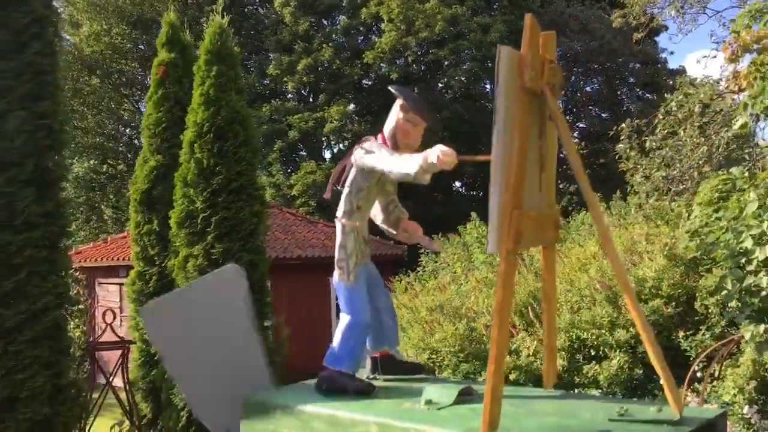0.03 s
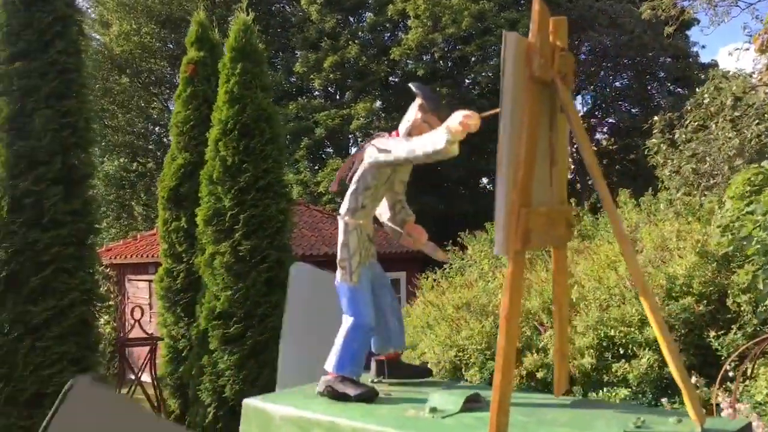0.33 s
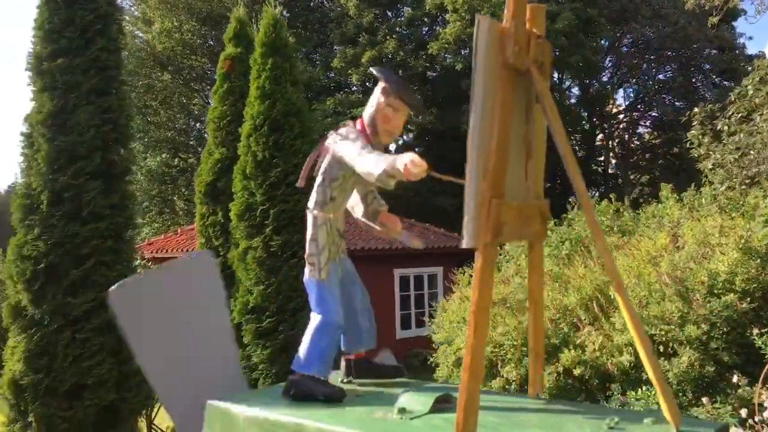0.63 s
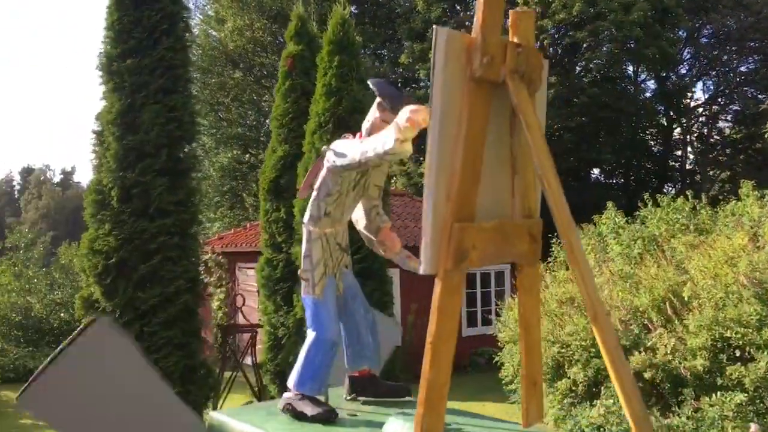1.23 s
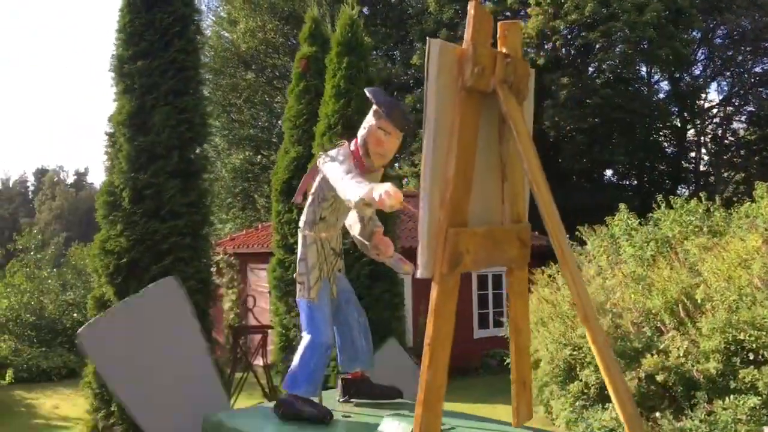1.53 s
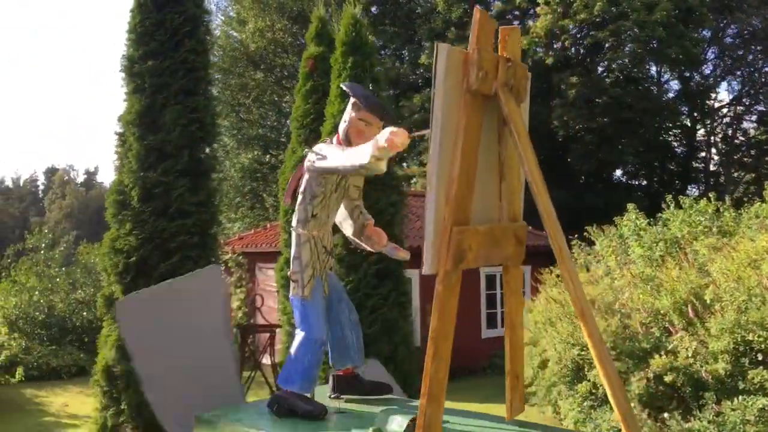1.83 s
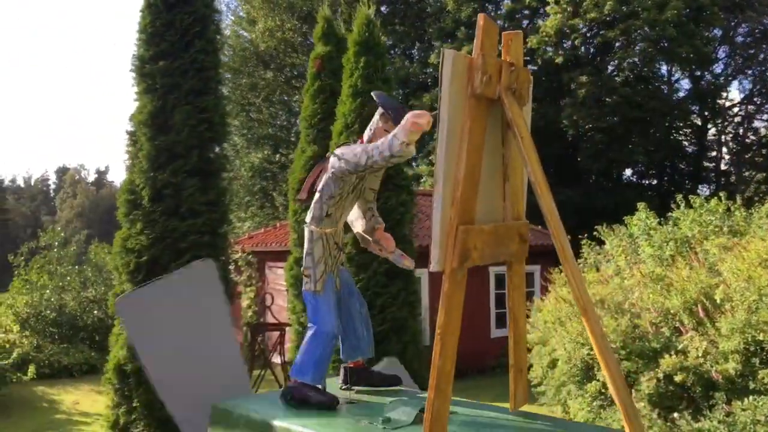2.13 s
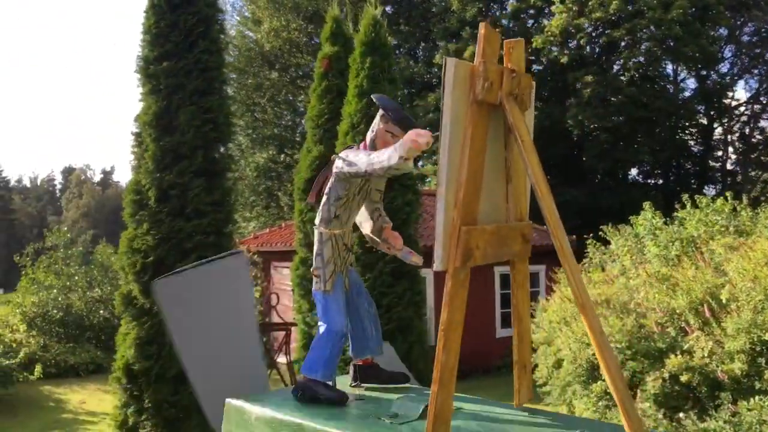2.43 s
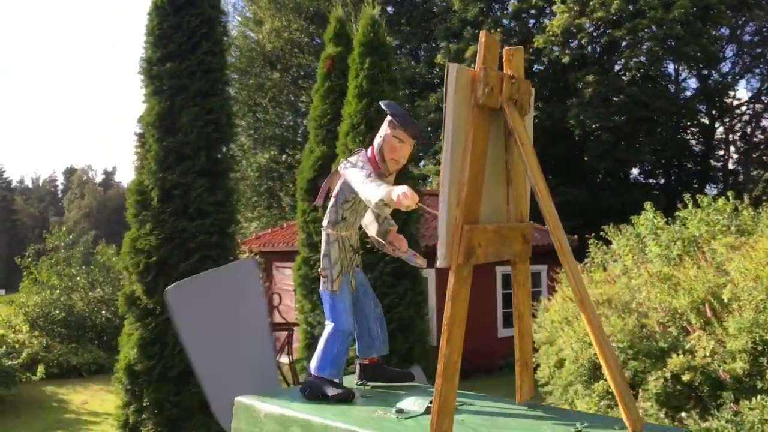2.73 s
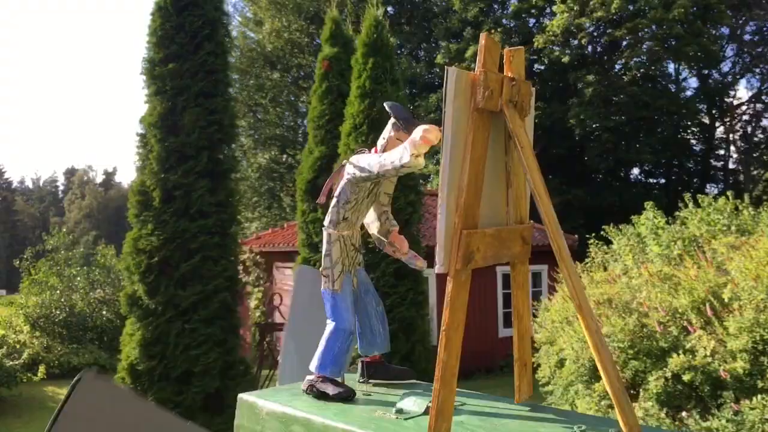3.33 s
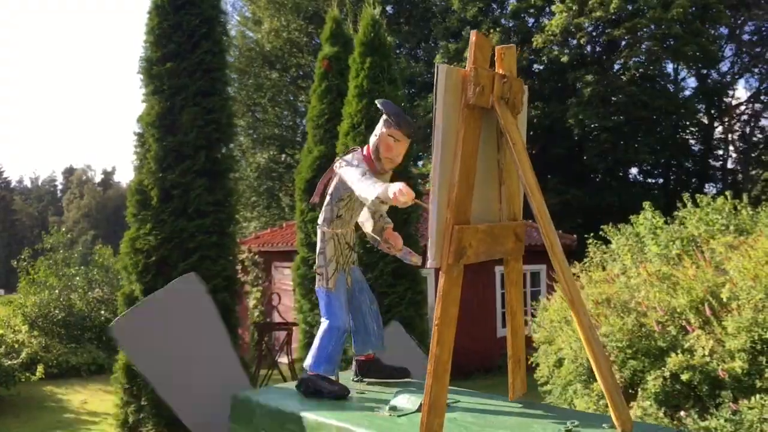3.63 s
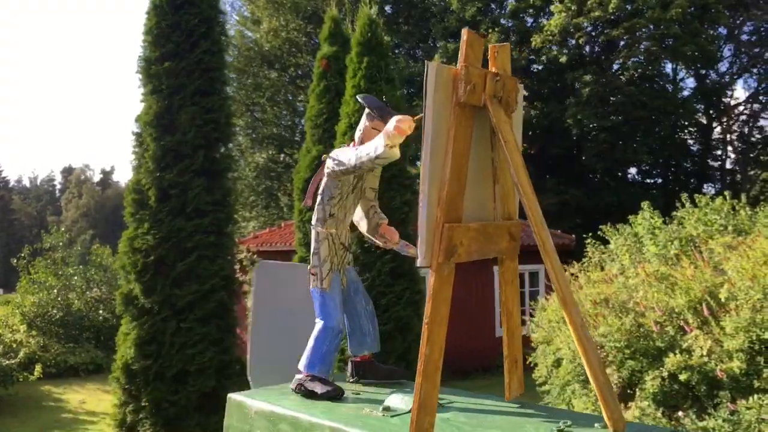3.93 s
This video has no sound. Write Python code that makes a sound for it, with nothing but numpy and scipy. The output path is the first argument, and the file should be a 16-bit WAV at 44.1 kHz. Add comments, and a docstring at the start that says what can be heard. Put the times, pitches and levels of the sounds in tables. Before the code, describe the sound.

Irregular dry clacks come from a wooden whirligig outdoors, some doubled, and its shaft squeaks briefly toward the end. Wind buffets the microphone in low gusts while leaves hiss faintly in the garden.

```python
"""Wooden whirligig in a garden

The slack linkage of a small whirligig knocks against its wooden figure and base, often with a lighter
touch just before or after; each impact excites the damped modes of the wood. The rods rub before some
knocks, and stick-slip friction makes the dry shaft squeak, mostly near the end. Turbulent gusts buffet
the microphone over a soft hiss of leaves."""
import sys
import numpy as np
from scipy import signal
from scipy.fft import rfft, irfft
from scipy.io import wavfile
from scipy.ndimage import uniform_filter1d

SR = 44100
rng = np.random.default_rng(int(sys.argv[2]) if len(sys.argv) > 2 else 0)


def unload_wav(signal):
    """Save mono or channel-first audio to the path in sys.argv[1] as 16-bit WAV at rate SR, clipped to [-1, 1]."""
    wavfile.write(
        sys.argv[1],
        SR,
        np.round(np.clip(np.atleast_2d(signal).T, -1, 1) * 32767).astype(np.int16),
    )


N = 176400


def undb(db):
    """Amplitude ratio of a level in decibels."""
    return 10 ** (np.asarray(db) / 20)


def unit(x):
    """Normalisation to an rms of 1."""
    return x / np.sqrt(np.mean(x ** 2) + 1e-18)


def fade(t, t60):
    """Exponential decay: 60 dB in t60 seconds."""
    return np.exp(-np.log(1000) * t / t60)


def envelope(rows):
    """Amplitude envelope through (t/s, level/dB) points."""
    return undb(np.interp(np.arange(N) / SR, *np.array(rows).T))


def colour(hz, points):
    """Spectral envelope through (f/Hz, level/dB) points, on a logarithmic frequency axis."""
    f, db = np.array(points).T
    return undb(np.interp(np.log(np.maximum(hz, 1)), np.log(f), db))


def noise(points, size):
    """Random-phase noise of rms 1 with the given spectral envelope."""
    hz = np.fft.rfftfreq(size, 1 / SR)
    phases = np.exp(2j * np.pi * rng.random(len(hz)))
    return unit(irfft(colour(hz, points) * phases, size))


def wander(per_s, size):
    """Random modulation: linear interpolation between per_s Gaussian values a second."""
    steps = np.arange(size) / SR * per_s
    return np.interp(steps, np.arange(size), rng.standard_normal(size))


# spectrum of leaves and distant garden: f/Hz, relative density level/dB
LEAF_SPECTRUM = [(59, -26), (100, -6), (330, -5.5), (774, -12), (977, -9), (2320, -11), (3690, -11.5),
                 (9340, -18.5), (15500, -27)]
# strength of their hiss: t/s, level/dB
LEAF_LEVEL = [(0, -53.5), (1.1, -52), (2.4, -53), (3.1, -53.5), (4, -54.5)]
def leaves():
    """Many incoherent sources add up to a broadband hiss, whose level drifts slowly."""
    return noise(LEAF_SPECTRUM, N) * envelope(LEAF_LEVEL)


def eddies(spectrum, window_s=0.034):
    """Turbulent pressure noise, held at even strength by dividing by its running rms."""
    pressure = noise(spectrum, N)
    power = abs(signal.hilbert(pressure)) ** 2 / 2
    return pressure / np.sqrt(uniform_filter1d(power, int(window_s * SR)) + 1e-9)


# strength of the slow buffets and of the finer flutter: t/s, relative level/dB
BUFFET_LEVEL = [(0.07, -30.5), (0.25, -33), (0.27, -55), (0.37, -27), (0.42, -39), (0.65, -42.5),
                (0.67, -59), (0.74, -56), (0.765, -38), (0.85, -43.5), (0.9, -23), (0.95, -54),
                (1.09, -53.5), (1.12, -40), (1.185, -30), (1.22, -48), (1.29, -45.5), (1.36, -24),
                (1.42, -43.5), (1.48, -31), (1.73, -46.5), (1.75, -29.5), (1.81, -44), (1.85, -20.5),
                (1.88, -35), (2.01, -27.5), (2.04, -39), (2.09, -36.5), (2.29, -53.5), (2.34, -46),
                (2.66, -52), (2.72, -41.5), (2.89, -54.5), (3.02, -32.5), (3.07, -44), (3.09, -35),
                (3.15, -57), (3.36, -37), (3.53, -70.5), (3.84, -59)]
FLUTTER_LEVEL = [(0.08, -30.5), (0.17, -33), (0.26, -49.5), (0.29, -36.5), (0.44, -37.5), (0.485, -60),
                 (0.52, -37), (0.57, -53), (0.7, -68), (0.86, -47), (0.88, -57), (0.91, -74), (1.05, -77),
                 (1.18, -47.5), (1.22, -69), (1.38, -41.5), (1.39, -46), (1.48, -32.5), (1.64, -39),
                 (1.7, -51.5), (1.79, -51), (1.84, -38.5), (2.01, -28), (2.05, -40), (2.1, -31.5),
                 (2.13, -49), (2.16, -34.5), (2.26, -68), (2.37, -47.5), (2.5, -61.5), (2.96, -64),
                 (3.01, -36), (3.17, -69), (3.36, -46), (3.44, -65)]
# their spectra: f/Hz, relative density level/dB
BUFFET_SPECTRUM = [(25, -70), (33, -24), (48, 1.5), (72, 2), (110, -6), (170, -24.5), (300, -31.5),
                   (700, -99)]
FLUTTER_SPECTRUM = [(15, -71), (60, -18), (125, 4.5), (200, 0.5), (300, -10), (500, -19.5), (750, -31.5),
                    (1500, -37.5), (4000, -53)]
def gusts():
    """Turbulence at the microphone makes low-frequency pressure fluctuations: rumble and flutter."""
    buffets = undb(1) * envelope(BUFFET_LEVEL) * eddies(BUFFET_SPECTRUM)
    flutter = envelope(FLUTTER_LEVEL) * eddies(FLUTTER_SPECTRUM)
    return buffets + flutter


# single puffs of air: t/s, width/s, peak level before the bass cut/dB
AIR_PUFFS = [(0.095, 0.0012, -19), (0.467, 0.0014, -16.5), (0.884, 0.001, -27), (1.357, 0.0031, -19),
             (1.893, 0.0017, -16), (1.949, 0.0011, -18), (1.956, 0.0011, -18), (1.993, 0.00093, -20),
             (2.098, 0.0027, -16.5)]
def puffs(bass_cut_hz=41.7):
    """A pressure pulse pushes the microphone once and rebounds through its high-pass response."""
    pressure = np.zeros(N)
    for at, width, db in AIR_PUFFS:
        u = (np.arange(N) / SR - at) / width
        pressure += undb(db) * (1 - u ** 2) / (1 + u ** 2) ** 2
    return signal.sosfilt(signal.butter(2, bass_cut_hz, "high", fs=SR, output="sos"), pressure)


def add(out, start, x):
    """Superposition of x on out from a start time in seconds."""
    i = max(int(start * SR), 0)
    out[i:i + len(x)] += x[:len(out) - i]


# modes of the wooden body: f/Hz, relative level/dB, T60/s
WOOD_MODES = [(630, -17, 0.54), (817, -19, 0.78), (1108, -12.5, 0.35), (1321.5, -8, 0.34), (1557, -5, 0.16),
              (1670, -7, 0.12), (1830, -13, 0.16), (2194, -1.5, 0.091), (2373, -5, 0.17),
              (3014, -2.5, 0.089), (3730, -14, 0.067), (6800, -7, .07), (9300, -9.5, 0.16),
              (12000, -11, 0.066)]
def wood_modes(t, hardness, scatter_db=1.5):
    """Free vibration is a sum of damped sinusoids, weighted by the spectrum of the blow."""
    ring = np.zeros(len(t))
    for hz, db, t60 in WOOD_MODES:
        gain = undb(db + scatter_db * rng.standard_normal()) * colour(hz, hardness)
        ring += gain * fade(t, t60) * np.sin(2 * np.pi * (hz * t + rng.random()))
    return ring


# dense response of the wood between those modes: f/Hz, relative density level/dB
WOOD_SPECTRUM = [(150, -45), (450, -4), (700, -8.5), (1050, 0), (1900, -2), (2350, 1), (2700, -3.5),
                 (3250, -4), (3700, 4), (4800, -6), (7200, -7), (13000, -17.5), (15800, -27)]
def wood_noise(gain, size):
    """Overlapping modes merge into noise, here weighted by a gain at each frequency."""
    return irfft(rfft(noise(WOOD_SPECTRUM, size)) * gain)


# blows of the linkage: t/s, level/dB, gain at 4 kHz/dB, gain at 11 kHz/dB, chatter time/s,
# f of the struck spot/Hz, relative level of its ring/dB
LINKAGE_BLOWS = [(0.1549, -35.5, -3, -1, 0.00072, 1480, -4), (0.5732, -33.5, -2, -2.5, 0.0028, 1110, -6.5),
                 (0.7913, -40.5, -9, -8, .003, 1090, -2), (0.8024, -32.5, -7, -8, 0.0034, 2380, -5),
                 (1.104, -39.5, 2, 18, .004, 1495, 4.5), (1.1052, -31, 3, 2, 0.0039, 3460, -2.5),
                 (1.461, -31.5, -6, -11.5, .0022, 2304, -3.5), (1.4718, -37.5, -3, -6, 0.0092, 985, -7),
                 (1.661, -38.5, -3, -12, .001, 1065, -3), (1.670, -34.5, -9.5, -13, 0.0084, 2413, -5),
                 (2.0583, -28, 2, -4.5, 0.0012, 2387, -7.5), (2.3074, -40, 1, -3, .002, 1330, 1),
                 (2.3122, -24.5, 2, 6.5, 0.0022, 2207, -3.5), (2.3158, -33, -4, 3, 0.0014, 1502, 3.5),
                 (2.5211, -35.5, -4.5, -6, 0.0079, 1057, -2.5), (2.7498, -31.5, -0.5, 5, 0.006, 2410, -4),
                 (3.2424, -36, -3, -6, .002, 1380, -7), (3.252, -31.5, 1.5, 0.5, 0.0067, 2540, -6)]
def knocks(attack_s=0.00011, tail_corner_hz=1490):
    """Impact excitation: a crack, a dense clack, a duller tail and the ring of body and struck spot."""
    out, size = np.zeros(N), 16384
    t, hz = np.arange(size) / SR, np.fft.rfftfreq(size, 1 / SR)
    attack = np.minimum(t / attack_s, 1)
    bright = np.sqrt(hz / 3000)
    dull = 1 / np.hypot(1, hz / tail_corner_hz)
    for start, db, middle_db, treble_db, chatter_s, spot_hz, spot_db in LINKAGE_BLOWS:
        hardness = [(1800, 0), (4000, middle_db), (11000, treble_db)]
        blow = colour(hz, hardness)
        since_chatter = np.maximum(t - chatter_s, 0)  # the clack holds while the contact chatters
        crack = undb(3) * wood_noise(blow * bright, size) * fade(t, t60=0.0023)
        clack = undb(-3.7) * wood_noise(blow, size) * fade(since_chatter, t60=0.079)
        tail = undb(-9.5) * wood_noise(blow * dull, size) * fade(t, t60=0.32)
        body = undb(-10) * wood_modes(t, hardness)
        spot = undb(spot_db) * fade(t, t60=0.079) * np.sin(2 * np.pi * spot_hz * t)
        add(out, start, undb(db) * attack * (crack + clack + tail + body + spot))
    return out


# partials of the rasp: multiple of a third of the squeak's frequency, relative level/dB
RASP_PARTIALS = [(2, 0), (4, 3.5), (5, -1.5), (6, -2.5), (7, -10.5), (8, -9)]
# dry scraping within the rasp: f/Hz, relative density level/dB
SCRAPE_SPECTRUM = [(800, -7), (1800, 1.5), (6000, 0), (10000, 1), (15500, -7)]
def rasp(phase, hz, waver=0.017):
    """Period tripling: the shaft slips unsteadily at a third of its pitch, with scraping noise."""
    size = len(phase)
    drift = 2 * np.pi * np.cumsum(hz * waver * wander(per_s=700, size=size)) / SR
    slip_phase = (phase + drift) / 3
    partials = sum(undb(db) * np.sin(k * slip_phase) for k, db in RASP_PARTIALS)
    return partials + undb(-5.5) * noise(SCRAPE_SPECTRUM, size)


# squeaks of the shaft: t/s, duration/s, f/Hz, level/dB, relative levels of octave/dB and rasp/dB
SHAFT_SQUEAKS = [(0.32, 0.012, 5520, -47, -26, -35), (2.67, 0.026, 5390, -42.5, -18, -30),
                 (2.893, 0.026, 5364, -32.5, -2, -10), (3.102, 0.024, 5320, -38, -10, -23),
                 (3.324, 0.024, 5348, -29.5, -11, -5.5), (3.786, 0.04, 5417, -29.5, -2.5, -22.5)]
def squeaks(release_s=0.0085, sag_per_s=0.4, waver=0.018):
    """Stick-slip oscillation swells into a wavering, sagging whistle that rasps at its height."""
    out, size = np.zeros(N), 4096
    t = np.arange(size) / SR
    for start, length, hz, db, octave_db, rasp_db in SHAFT_SQUEAKS:
        swell = np.minimum(t / length, 1) ** 0.9
        grip = swell * np.clip((length - t) / release_s + 0.5, 0, 1)
        grip /= grip.max()
        pitch = hz * (1 + sag_per_s * (length - t) + waver * wander(per_s=700, size=size))
        phase = 2 * np.pi * np.cumsum(pitch) / SR
        whistle = np.sin(phase) + undb(octave_db) * np.sin(2 * phase)
        roughness = undb(rasp_db) * grip ** 1.4 * rasp(phase, hz)  # sets in later than the whistle
        add(out, start, undb(db) * grip * (whistle + roughness))
    return out


def frame_ring(squeak, split_hz=9200):
    """Reverberation: the frame and its surroundings ring on after a squeak, the treble dying first."""
    t = np.arange(N // 10) / SR
    white = rng.standard_normal(len(t))
    low = signal.sosfiltfilt(signal.butter(2, split_hz, fs=SR, output="sos"), white)
    response = low * fade(t, t60=0.19) + (white - low) * fade(t, t60=0.1)
    response /= np.linalg.norm(response)
    return squeak + undb(-3) * signal.fftconvolve(squeak, response)[:N]


# rods rubbing on the wood: t of the peak/s, duration/s, level/dB
ROD_RUBS = [(0.758, 0.043, -52), (1.648, 0.051, -53.5), (2.519, 0.018, -47.5), (2.753, 0.086, -47)]
def rubs(top_hz=2400, grain_db=0.5):
    """Sliding friction drives the same wood in brief swells of slightly grainy noise."""
    t = np.arange(N) / SR
    swells = sum(undb(db) * np.exp(-(2 * (t - at) / length) ** 2) for at, length, db in ROD_RUBS)
    friction = signal.sosfilt(signal.butter(2, top_hz, fs=SR, output="sos"), noise(WOOD_SPECTRUM, N))
    grain = undb(-grain_db * wander(per_s=450, size=N))
    return swells * unit(friction * grain)


# tiny slips of the shaft: t/s, level/dB
SHAFT_SLIPS = [(1.554, -49), (1.965, -47.5), (2.364, -48), (3.187, -49), (3.639, -47.5)]
# their spectrum: f/Hz, relative density level/dB
SLIP_SPECTRUM = [(9300, -18), (10700, 1), (12800, -24)]
def slips(length_s=0.01):
    """Frictional slips too brief to settle on a pitch give scratchy bursts of band-limited noise."""
    out, size = np.zeros(N), int(length_s * SR)
    for start, db in SHAFT_SLIPS:
        add(out, start, undb(db) * np.hanning(size) * noise(SLIP_SPECTRUM, size))
    return out


def scene():
    """Linear superposition of whirligig, wind and leaves at one microphone."""
    whirligig = knocks() + rubs() + frame_ring(squeaks()) + slips()
    return (whirligig + gusts() + puffs() + leaves())[None]


def record(dry):
    """Band limiting: a steep elliptic low-pass removes the treble above 15.8 kHz."""
    return signal.sosfilt(signal.ellip(12, 0.2, 90, 15800, fs=SR, output="sos"), dry)


dry = scene()
out = record(dry)
unload_wav(out)
```